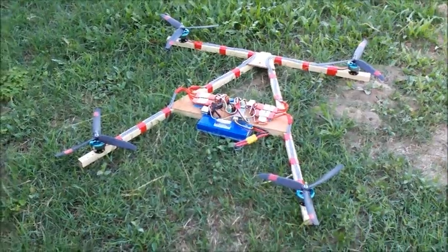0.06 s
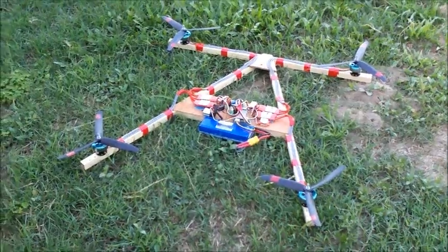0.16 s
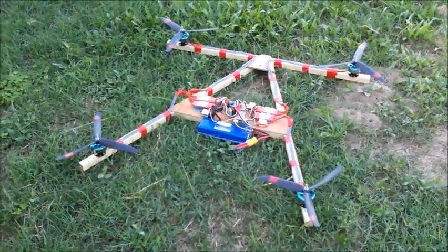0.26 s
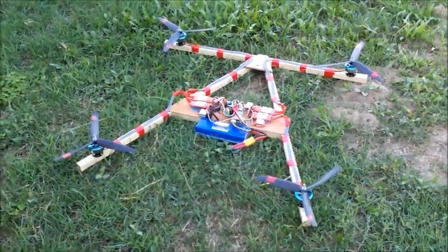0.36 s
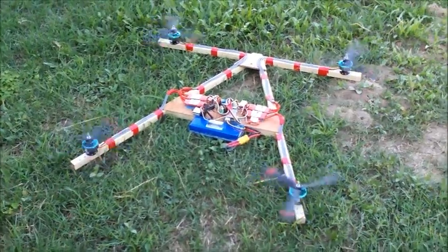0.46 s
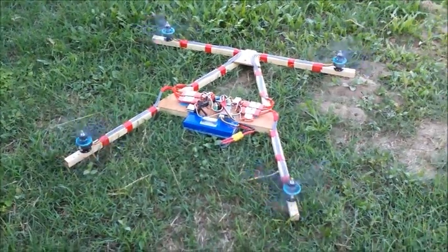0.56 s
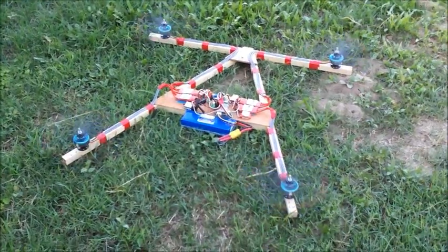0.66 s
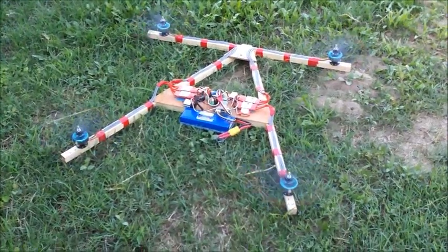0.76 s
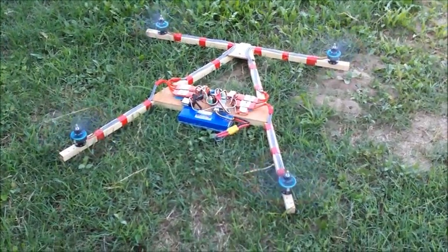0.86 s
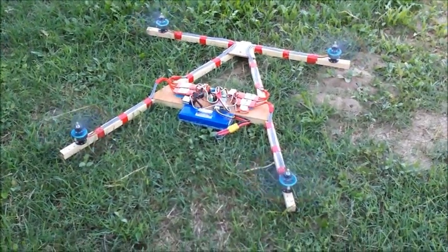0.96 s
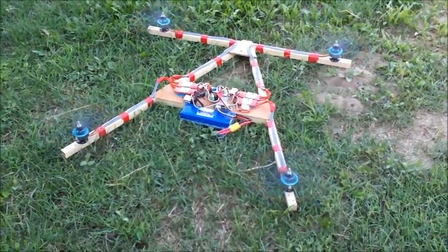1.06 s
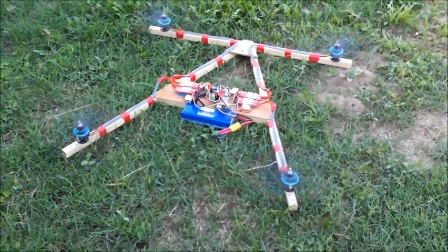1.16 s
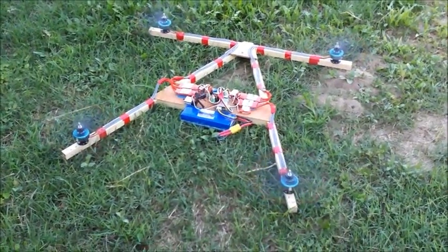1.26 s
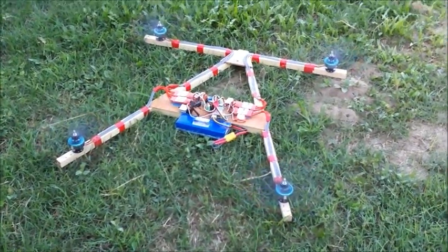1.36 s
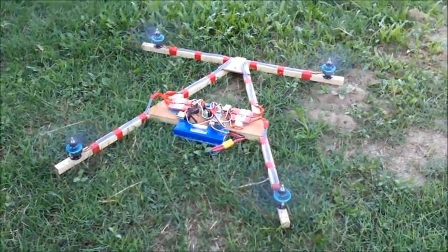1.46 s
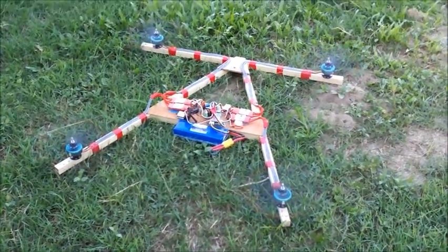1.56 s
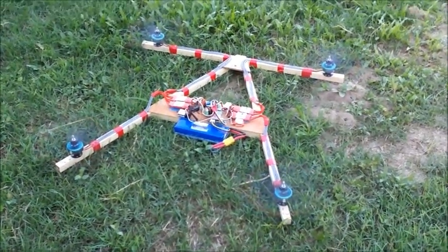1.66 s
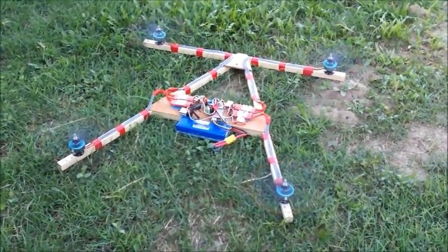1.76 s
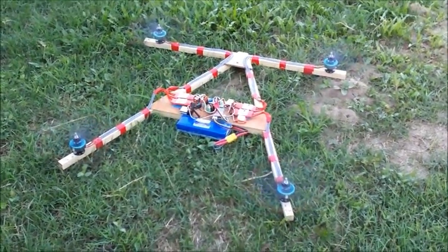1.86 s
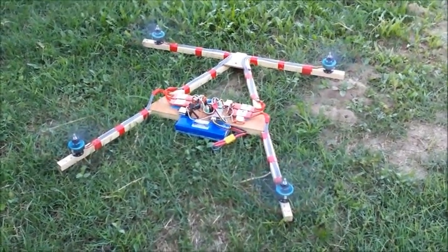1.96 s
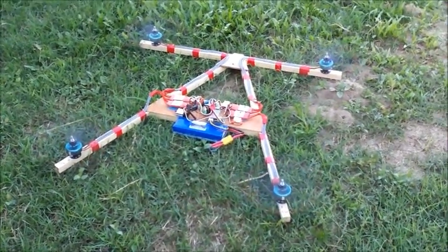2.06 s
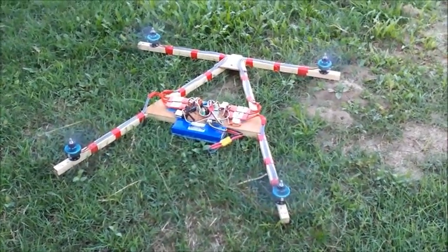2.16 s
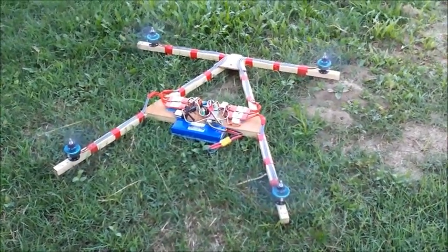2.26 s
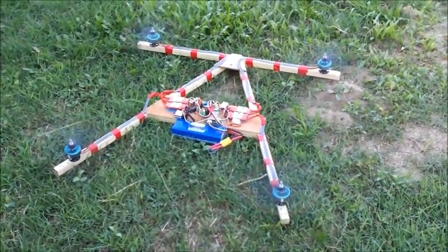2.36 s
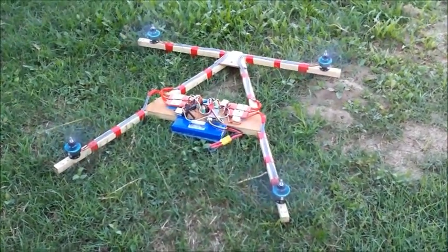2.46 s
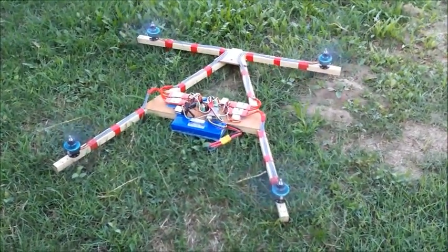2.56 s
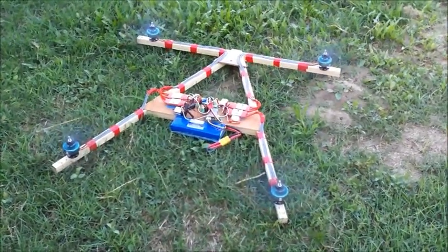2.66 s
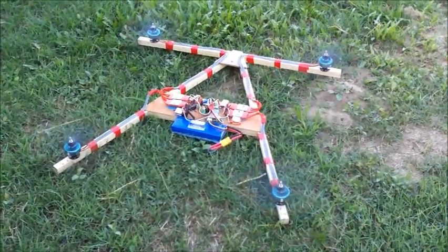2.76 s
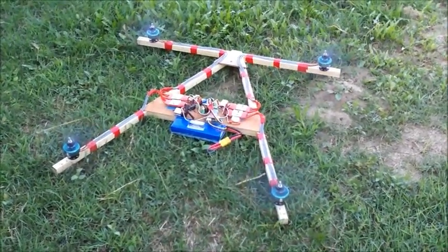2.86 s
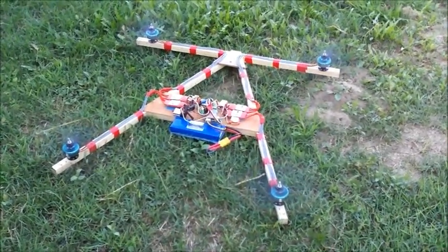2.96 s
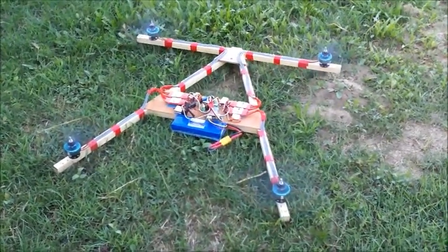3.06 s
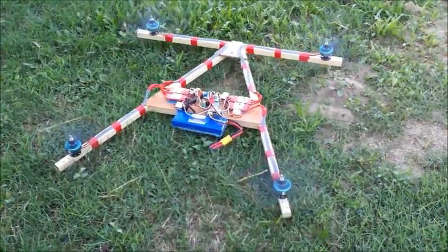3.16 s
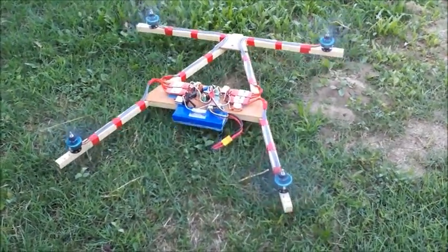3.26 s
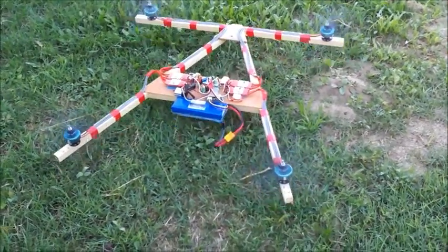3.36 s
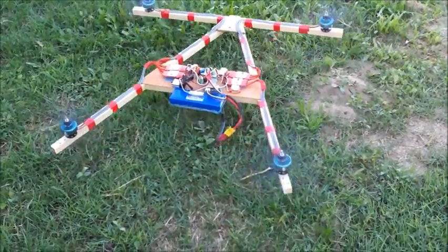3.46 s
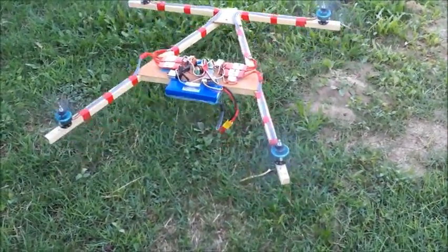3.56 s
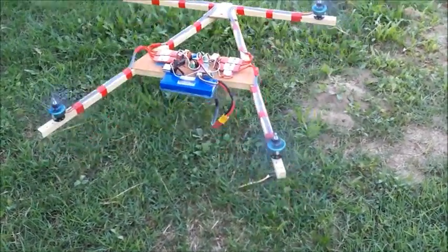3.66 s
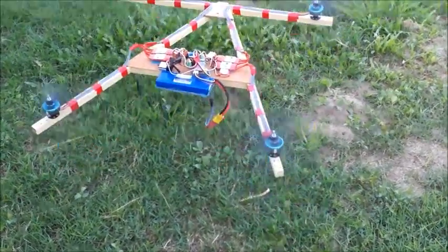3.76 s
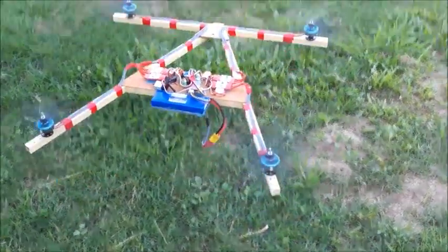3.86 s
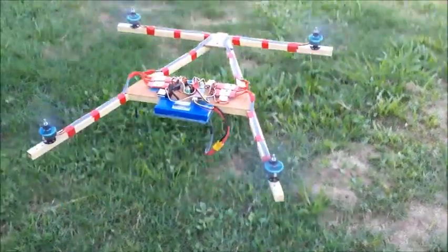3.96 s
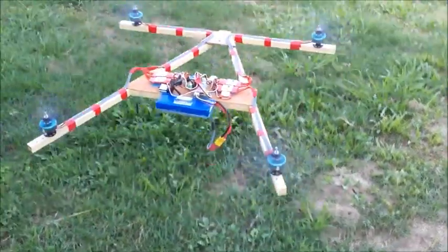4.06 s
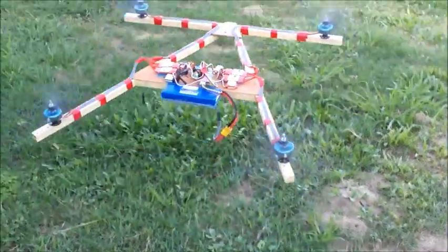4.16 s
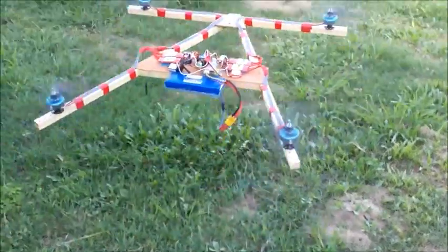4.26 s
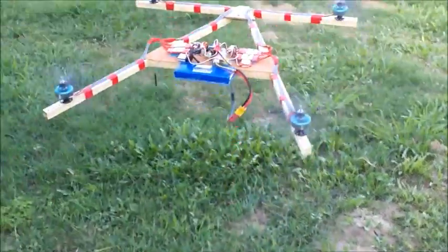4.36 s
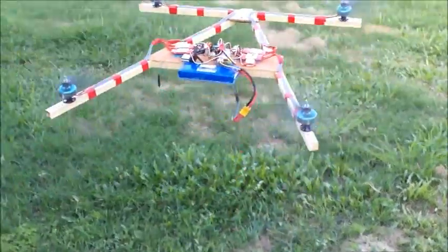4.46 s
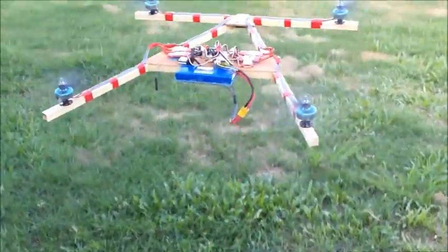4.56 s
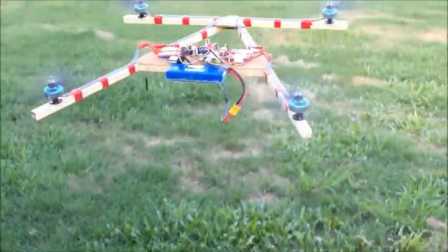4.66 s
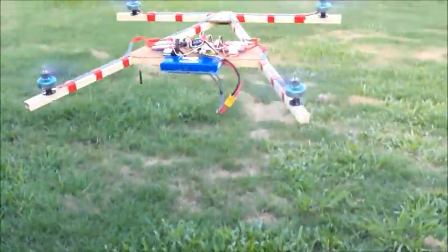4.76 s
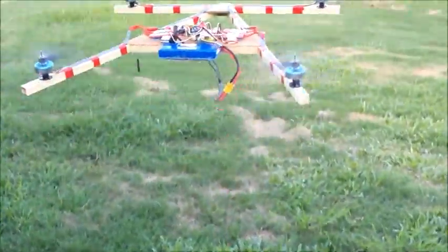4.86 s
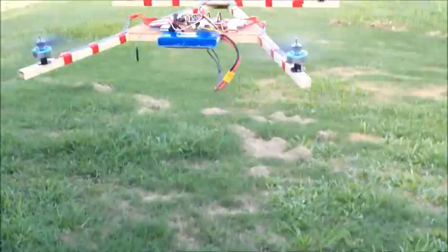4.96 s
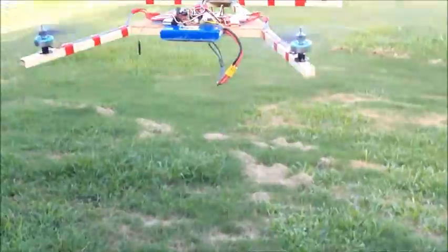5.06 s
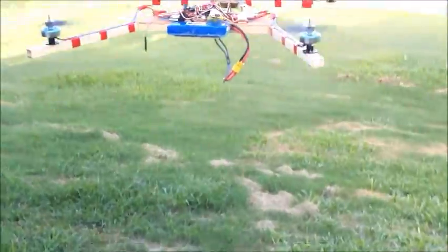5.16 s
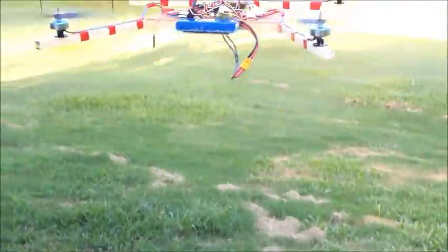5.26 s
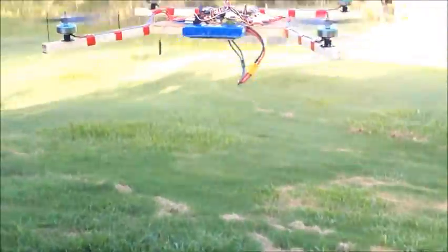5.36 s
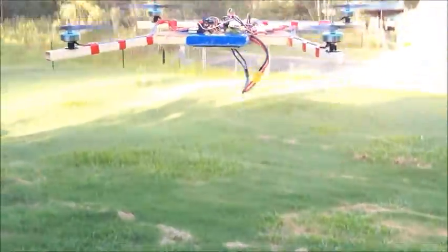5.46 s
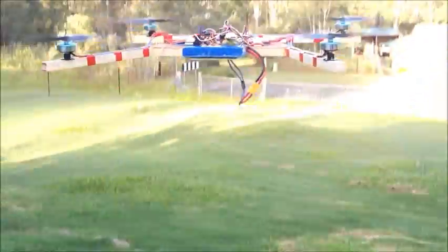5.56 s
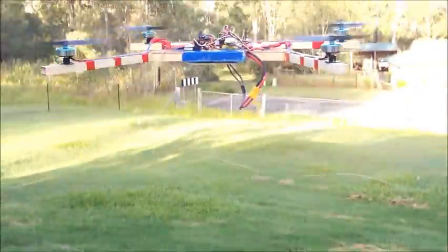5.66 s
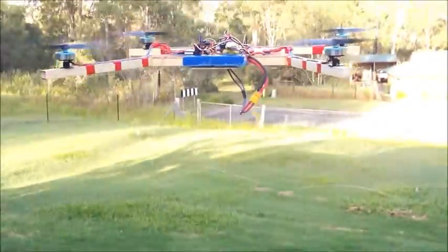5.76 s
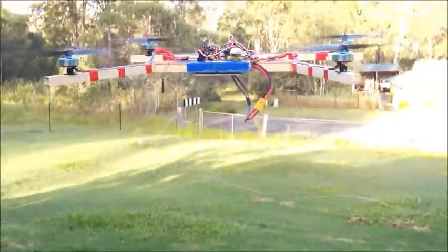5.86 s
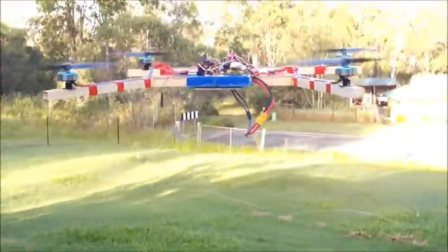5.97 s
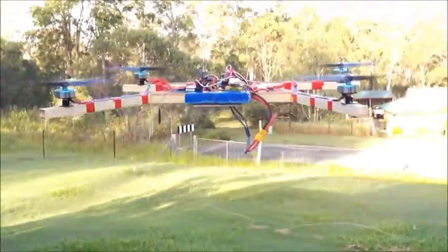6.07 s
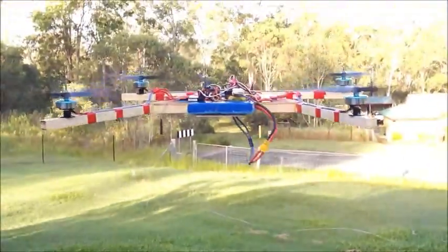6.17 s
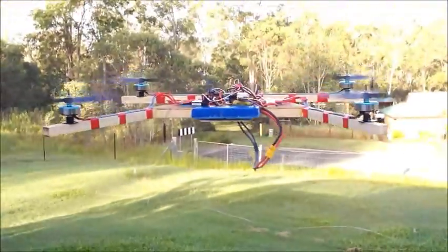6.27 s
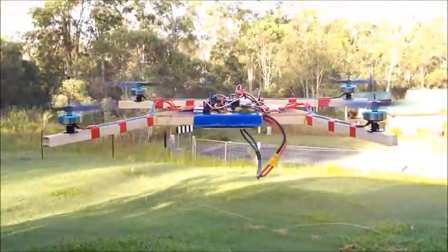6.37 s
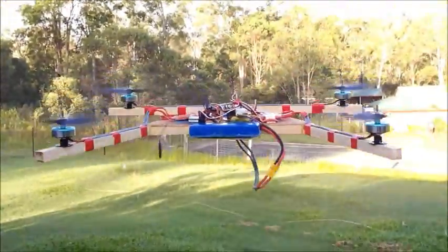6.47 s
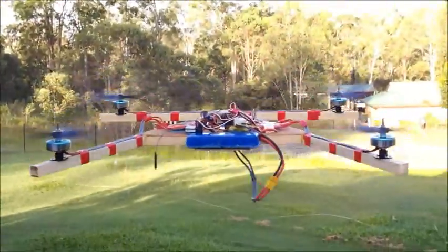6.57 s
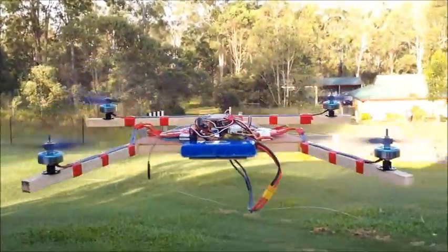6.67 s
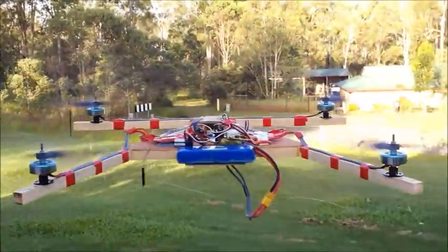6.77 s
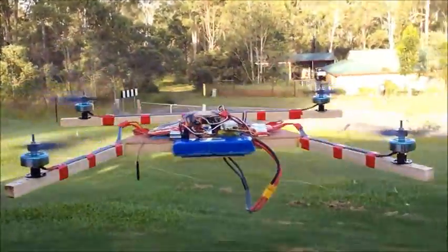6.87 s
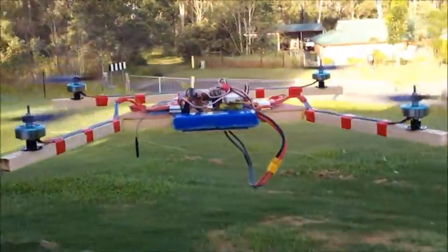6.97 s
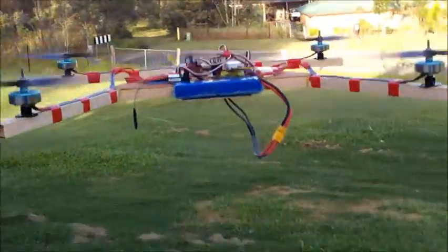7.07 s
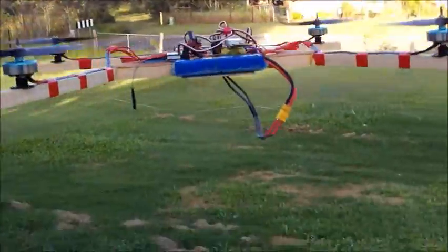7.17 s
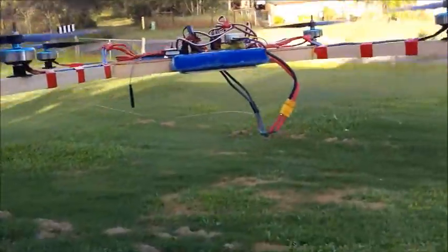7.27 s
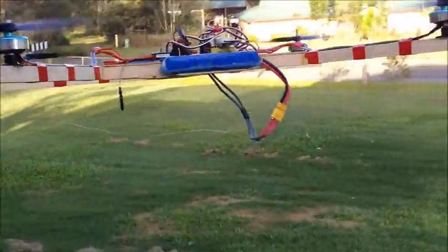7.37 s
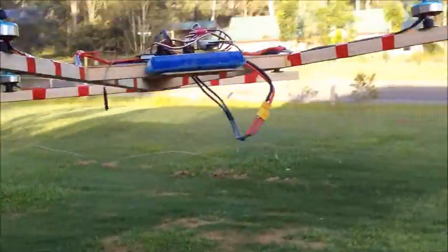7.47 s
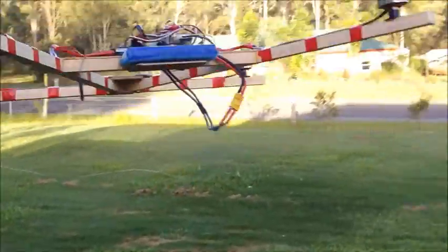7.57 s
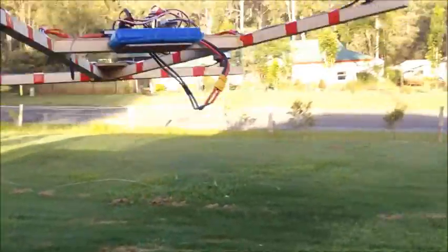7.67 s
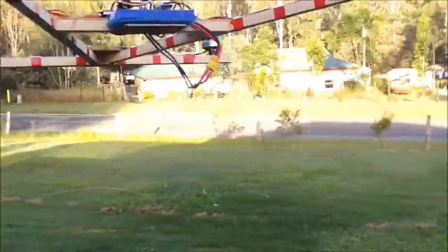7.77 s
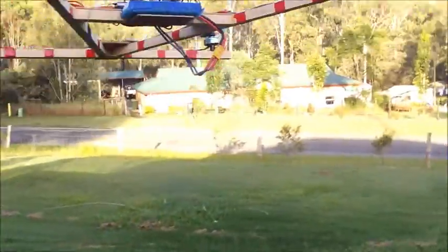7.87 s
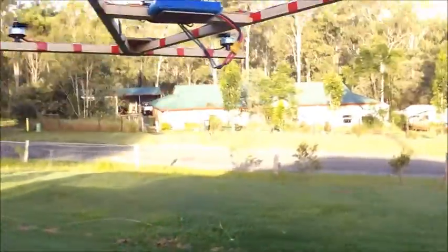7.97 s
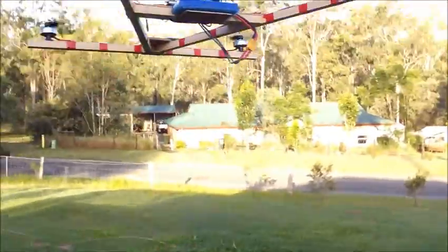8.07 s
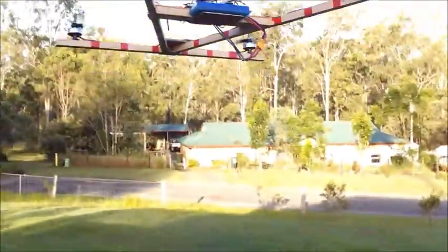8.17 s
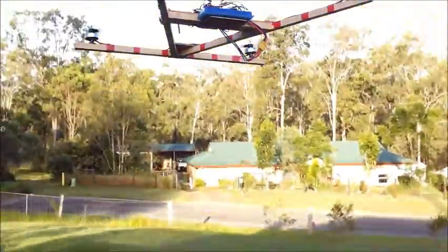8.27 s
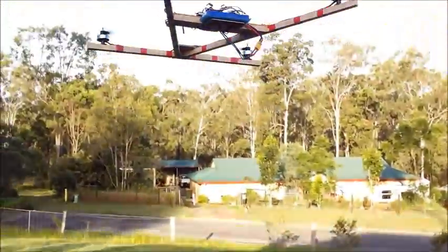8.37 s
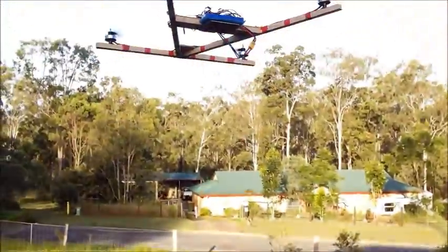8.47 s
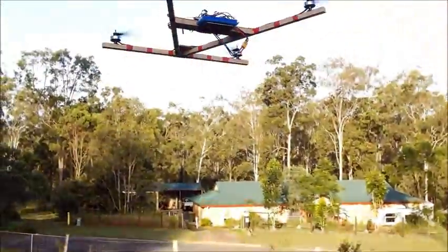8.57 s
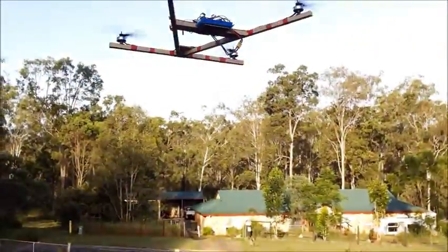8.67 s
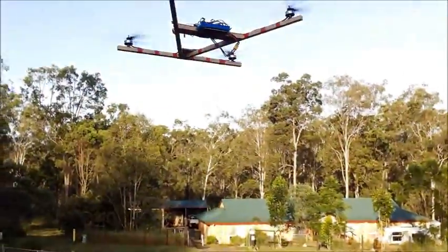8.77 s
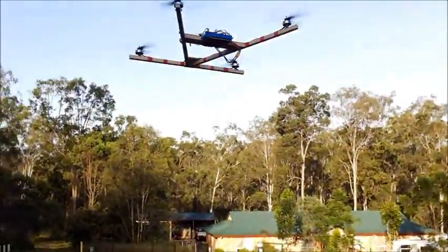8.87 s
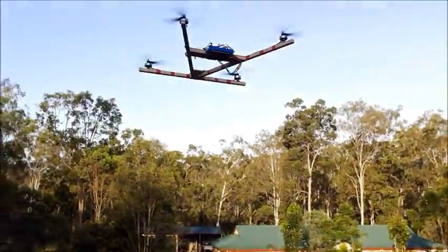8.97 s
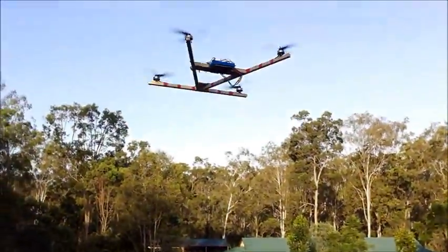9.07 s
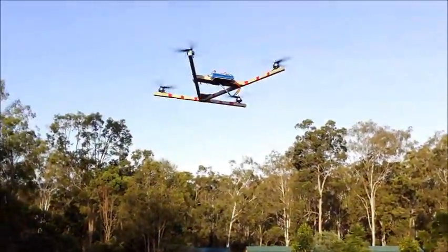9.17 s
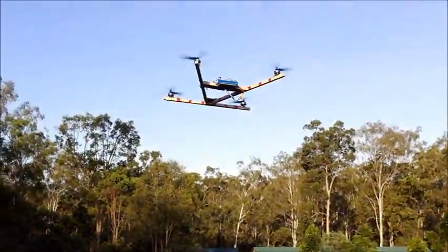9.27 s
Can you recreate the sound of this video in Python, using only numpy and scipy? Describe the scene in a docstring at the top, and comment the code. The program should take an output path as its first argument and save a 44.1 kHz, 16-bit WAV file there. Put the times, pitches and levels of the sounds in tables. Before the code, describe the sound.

A quiet lawn opens with a faint hush of air and a tiny electronic whistle. At about 0.5 seconds a small drone's motors start with sharp clacks, scratchy squeals and a brief metallic ring. Blade tips snip the grass, and the wooden frame knocks lightly on the ground several times until 1.8 seconds. Meanwhile the four propellers build into a buzz that rises in pitch, with hissing air and a thin, high whine. The drone lifts off around 3 seconds and is loudest until about 4.5, with brief rasps and a high, ringing motor whistle that comes and goes. From 5 to 7 seconds it hovers nearby, softer, its pitch wavering. Between 7 and 8.3 seconds it sweeps close, swelling and brightening, with faint puffs of air on the microphone. It then climbs overhead, thinner and fainter, still buzzing at about 9.3 seconds.

```python
"""On a quiet lawn, a home-built drone spins up, lifts off, hovers close by and climbs away overhead.
Its four three-bladed propellers buzz, one slap of air for each passing blade, and churn the air into a
hiss. The motors whine as their current switches on and off, and their bells (the spinning metal caps)
ring. At first the motors clack and squeal, the wooden frame knocks and the blade tips clip the grass.
Later, as the drone sweeps past, the air it blows down puffs against the microphone."""
import sys
import numpy as np
from scipy import signal
from scipy.fft import rfft, irfft, next_fast_len
from scipy.io import wavfile
from scipy.ndimage import uniform_filter1d

SR = 44100
rng = np.random.default_rng(int(sys.argv[2]) if len(sys.argv) > 2 else 0)


def store_wav(level_fs):
    """Save 16-bit WAV to argv[1]."""
    pcm = np.round(np.clip(np.atleast_2d(level_fs), -1, 1) * 32767)
    wavfile.write(sys.argv[1], SR, pcm.T.astype(np.int16))


N = 411453
TIME = np.arange(N) / SR
FFT_SIZE = next_fast_len(N, True)
BIN_HZ = np.maximum(np.arange(FFT_SIZE // 2 + 1) * SR / FFT_SIZE, 1)

START_S, SPIN_UP_S, HOVER_TURNS_PER_S, BLADES = .49, .3, 95, 3
LIFTING_S = (2.0, 3.4)   # the drone grows light and leaves the lawn
PASS_S = (7.15, 7.82, 8.35)   # it sweeps past: begins, closest, ends
OVERHEAD_S = (7.8, 8.7)   # it climbs overhead, where its frame hides the motors
LEAVING_S = (8.2, 8.7)   # it turns its underside to the microphone

# Levels in the tables are relative: the functions add their own gains.
# speed asked of the rotors; one pair works harder to keep the drone level:
# (time [s], rotor 1 [turns/s], rotor 2 [turns/s], rotor 3 [turns/s], rotor 4 [turns/s])
ASKED_SPEEDS = [(.49, 45.5, 44.8, 43.6, 42), (1.6, 55, 53.8, 52.2, 50.5), (1.8, 62.5, 61.5, 59.5, 58),
                (2.1, 80, 79, 77, 75), (2.57, 99, 83, 81, 78), (2.72, 96.5, 85, 83.5, 82),
                (3.08, 100, 86, 84.5, 82), (3.22, 103, 101, 88, 85), (3.38, 108, 105.5, 86, 84),
                (3.7, 106, 102, 88, 86), (3.85, 106.5, 103, 89, 87.5), (4.22, 105.5, 103, 87, 84.5),
                (4.5, 104.3, 102.8, 88.3, 86.5), (4.8, 102.3, 101, 88.8, 87.3),
                (5.15, 102.3, 100.5, 86.7, 85.5), (5.35, 98.5, 96, 81.4, 82.2), (5.8, 98, 95.6, 82.4, 83),
                (6.2, 97.5, 95, 84.8, 84), (6.5, 96, 94, 87.2, 86), (6.66, 101.5, 98, 93, 91),
                (6.85, 103, 101, 99.5, 95), (7.1, 100, 98.7, 97.5, 94), (7.42, 101, 99, 97, 95),
                (7.65, 99.6, 98, 97, 94), (8.0, 102.5, 100.5, 98.5, 95), (8.15, 106, 104.5, 94, 92),
                (8.33, 107, 105, 93.5, 91.5), (8.52, 98, 96, 94, 91), (8.8, 99.3, 97.5, 95, 90),
                (9.33, 99.6, 98, 92, 88.5)]
# how much each rotor wanders as the flight controller nudges it: (share of its speed [0-1])
SPEED_WANDER = (.008, .011, .005, .012)
# how far the drone is from the microphone: (time [s], distance [m])
DISTANCE = [(0, 1.3), (3, 1.104), (4.5, 1.236), (6, 1.14), (7.4, 0.87), (8.1, 1.09), (8.7, 1.42),
            (9.33, 3.2)]
# from on the lawn (0) to above the microphone (1): (time [s], share aloft [0-1])
ALOFT = [(0, 0.035), (2.8, 0.014), (3.5, 0.45), (4.5, 0.48), (5.4, 0.88), (7.1, 0.63), (7.7, 0.91),
         (9.33, 1)]
# rotors beam their noise along their axes, so they are quieter edge-on: (time [s], level [dB])
BEAM = [(.5, -5.5), (2.0, -4.5), (3.1, -2.5), (3.4, 0.25), (4.2, -0.5), (4.8, -6), (5.5, -11.5),
        (6.3, -12.5), (6.8, -11), (7.5, -10), (7.78, -5), (8.3, -9), (8.8, -12.5), (9.33, -9.5)]
# how much louder the faster pair of rotors buzzes than the slower pair: (time [s], extra level [dB])
PAIR_BALANCE = [(.5, 8), (1.6, 11), (1.95, -2), (3.05, 2.5), (3.5, 3), (3.9, -6.5), (4.4, 8), (4.9, -0.5),
                (5.5, -2), (9.33, -2)]

# quiet outdoor air: (frequency [Hz], level [dB])
OUTDOOR_COLOUR = [(25, -34), (60, -25), (110, -9), (160, -17), (300, -11.5), (500, -7.5), (950, -1),
                  (1850, -10.5), (2450, -10.5), (3300, -16), (6500, -18.5), (9000, -13), (11500, -27),
                  (15000, -30)]
# puffs of air on the microphone: (time [s], peak level [dB], rise and fall time [s])
PUFFS = [(7.163, -58, 0.04), (7.307, -62, 0.032), (7.44, -66, 0.035), (7.73, -77, .04), (7.89, -60, 0.082)]
# the rumble of those puffs: (frequency [Hz], level [dB])
PUFF_COLOUR = [(25, -10), (60, 4), (120, 8), (200, 7), (400, -25), (1000, -62)]
# blade tips clipping grass: (time [s], level [dB])
GRASS_SNIPS = [(0.638, -39), (0.666, -50), (0.6934, -37), (0.7069, -31), (0.8071, -45), (0.8939, -48),
               (0.9124, -46), (0.9967, -43)]
# the frame knocking on the ground: (time [s], level [dB])
KNOCKS = [(0.5594, -38), (1.007, -31.5), (1.1207, -30), (1.2929, -50), (1.3262, -30), (1.3817, -51),
          (1.518, -30), (1.5868, -32), (1.603, -29), (1.8068, -31)]
# the notes the wooden frame rings at: (frequency [Hz], level [dB], time to fade by 60 dB [s])
FRAME_MODES = [(775, -9.5, 0.067), (1280, -26, 0.018), (1570, -1.5, 0.029), (1820, -4.5, 0.027),
               (1980, -19, .02), (3360, -9, 0.0087)]

# motors jerking into motion: (time [s], level [dB])
CLACKS = [(.523, -46), (.559, -37), (.643, -44.5), (.668, -44), (.81, -43.5), (.84, -42.5)]
# a motor breaking loose: (start [s], end [s], first pitch [Hz], last pitch [Hz], level [dB])
SQUEALS = [(.57, .67, 1570, 2030, -55), (0.656, 0.798, 1900, 2220, -54), (0.778, 0.829, 1670, 1660, -44)]
# shaft tones from unbalance and from the 14 magnets: (rate [cycles/turn], level [dB])
SHAFT_TONES = [(2, -25), (4, -18.5), (7, -6.5), (8, -7), (14, -1.5)]
# the notes the motor bells ring at: (frequency [Hz], width [Hz], level [dB])
BELL_MODES = [(5726, 40, 1.5), (5507, 177, -0.5), (5640, 66, -4.5)]
# the magnetic ripple behind the bells' rough ringing: (time [s], level [dB])
RIPPLE_LEVEL = [(.5, -24), (2.0, -14), (3.3, -14), (4.1, -16), (4.7, -4), (5.12, -9), (5.28, -5.5),
                (6.0, -9.5), (6.6, -26), (6.72, -1), (7.0, -8), (7.25, 1), (7.4, 1), (7.65, -1.5),
                (7.9, -2), (8.15, -3), (8.6, -13), (9.33, -17)]
# the loudest bell singing as ripple stays near its note: (time [s], pitch [Hz], level [dB])
BELL_WHISTLE = [(3.0, 5520, -60), (3.09, 5620, -38), (3.145, 5735, -26.5), (3.2, 5960, -44),
                (3.52, 5880, -48), (3.6, 5745, -25.5), (3.68, 5880, -44), (3.9, 5940, -38),
                (4.18, 5800, -37), (4.27, 5730, -29), (4.38, 5775, -32), (4.55, 5785, -27.5),
                (4.67, 5750, -31), (4.73, 5890, -33), (4.8, 5700, -30), (4.87, 5755, -31),
                (4.99, 5750, -25), (5.05, 5900, -38), (5.11, 5815, -33), (5.18, 5825, -32),
                (5.26, 5620, -39), (5.42, 5750, -42), (5.7, 5720, -40), (6.15, 5820, -46), (6.6, 5700, -52),
                (6.76, 5725, -33), (6.82, 5820, -28), (6.87, 5730, -28), (6.97, 5690, -38),
                (7.33, 5540, -38), (7.41, 5760, -23.5), (7.47, 5600, -38), (7.55, 5755, -29),
                (7.65, 5720, -40), (7.8, 5740, -30), (7.92, 5610, -33), (8.03, 5615, -32),
                (8.06, 5740, -22.5), (8.1, 5875, -36), (8.22, 5880, -37), (8.3, 5950, -36),
                (8.44, 5665, -33), (8.5, 5690, -34), (8.6, 5690, -52), (9.33, 5700, -60)]
# tones of the whine: (multiple of the switching rate [x], shift [cycles/turn], level [dB])
WHINE_TONES = [(1, -14, -7.5), (1, 14.5, -16.5), (1, 2, -17.5), (1, -24.5, -18), (2, -17, -31)]
# how strong the whine is: (time [s], level [dB])
WHINE_LEVEL = [(.5, -1), (.8, -2), (1.1, -2), (1.76, 2), (1.86, -2), (2.03, 0), (2.5, 0.5), (3.3, -3),
               (4.5, 2), (6, -0.5), (9.33, 4)]

# the low, middle and top band of the churned air: (low edge [Hz], high edge [Hz])
AIR_BANDS = [(700, 2500), (2500, 5200), (9200, 14500)]
# loudness of each band: (level in a hover at 1 m [dB], rise per doubled speed [dB], beam weight [x])
AIR_LEVELS = [(-29, 8.5, 1.21), (-25.5, 12.5, 1.19), (-33, 16, 0.71)]
# propeller sound heard from above, on the lawn: (frequency [Hz], level [dB])
COLOUR_ABOVE = [(90, -58), (200, -5), (400, -6.5), (700, -3), (950, 5.5), (1200, 2.5), (1600, 2.5),
                (2500, -4.5), (3900, -2), (4700, -5.5), (6500, -1), (8000, -4.5), (11000, -11),
                (15000, -18.5)]
# the same from beside, in the air: (frequency [Hz], level [dB])
COLOUR_BESIDE = [(170, -17), (420, -9.5), (600, -4), (830, 1.5), (1130, -9), (1450, -1), (1900, -3),
                 (2300, -0.5), (4600, -3.5), (6200, -0.5), (8200, -11), (9600, -8), (12500, -14),
                 (15000, -19)]
# the same from close underneath: (frequency [Hz], level [dB])
COLOUR_CLOSE = [(170, -29), (420, -13), (600, -8), (750, 4), (890, 5), (1130, -8.5), (1490, 1.5),
                (2050, -6.5), (2420, -2), (3400, -5.5), (4600, -3), (6200, -0.5), (8200, -7), (9600, -1.5),
                (12500, -7), (15000, -9)]
# the same from far beneath: (frequency [Hz], level [dB])
COLOUR_BENEATH = [(100, -63), (170, -33), (282, -17), (504, -19), (575, -16.5), (643, -30), (776, -4),
                  (1150, -23), (1360, -9.5), (1870, -14), (2300, -12), (3610, -12.5), (4960, -9.5),
                  (5550, -2.5), (8080, -8.5), (9930, -2.5), (15000, -10)]
# how the blade tones stand out from those colours: (frequency [Hz], boost [dB])
BLADE_BOOST = [(90, -5), (190, -16), (290, 3.5), (400, 14), (540, 16.5), (900, 11), (1500, 13),
               (2500, 12.5), (4500, 4), (9000, 1)]
# change to the low blade tones just above the lawn: (frequency [Hz], boost [dB])
GROUND_BOOST = [(230, -10), (310, 2.5), (460, 4.5), (570, -3.5), (750, 4.5), (1000, 0), (1500, 1)]
# blade tones surge as the blades bite harder: (time [s], level [dB])
BLADE_BITE = [(.5, 0), (1.4, 1.5), (2.0, -.5), (2.6, 1), (3.1, -1), (3.45, 1.5), (4.05, -3.5), (4.6, 1.5),
              (5.3, 0), (6.5, -0.5), (7.4, -1), (7.85, 3), (8.4, -3), (9.33, -5.5)]
# blade sound bouncing off the arms and the ground: (delay [s])
ECHO_DELAYS = (.0007, .0016, .0027)
# blades cutting through their own wake: (time [s], half-length [s], centre [Hz], level [dB])
RASPS = [(3.413, 0.033, 2900, -25.5), (3.545, 0.054, 2090, -30), (3.883, .006, 6200, -27),
         (3.963, 0.011, 2200, -29), (7.83, .012, 3300, -28.5)]


def from_db(db):
    """Turn decibels into a gain to multiply by."""
    return 10 ** (np.asarray(db) / 20)


def rms_one(x):
    """Scale a signal so that its average level (rms) is 1."""
    return x / np.sqrt(np.mean(x ** 2) + 1e-20)


def running_rms(x, size):
    """Average level over a sliding window of samples."""
    return np.sqrt(np.maximum(uniform_filter1d(x ** 2, size), 0) + 1e-5 * np.mean(x ** 2))


def sine(cycles):
    """A pure tone, from a running count of its cycles."""
    return np.sin(2 * np.pi * cycles)


def in_time(rows):
    """Join a table's points in time: one curve for each column after the first."""
    times, *columns = np.transpose(rows)
    return [np.interp(TIME, times, column) for column in columns]


def gains(points):
    """Turn a colour table (how loud each frequency is) into a gain for every frequency."""
    hz, db = np.transpose(points)
    return from_db(np.interp(np.log(BIN_HZ), np.log(hz), db))


def colour(x, gain):
    """Filter a signal with a gain for every frequency."""
    return irfft(rfft(x, FFT_SIZE) * gain, FFT_SIZE)[:N]


def noise(gain):
    """Filtered noise with an average level of 1."""
    return rms_one(colour(rng.standard_normal(N), gain))


def resonance(hz, width_hz):
    """The filter of something that rings at one note; 1 at its peak."""
    return 1 / (1 + 1j * (BIN_HZ ** 2 - hz ** 2) / (BIN_HZ * width_hz))


def drift(rate_hz, step=40):
    """A smooth random wander, about 1 in size; a higher rate wanders faster."""
    pole = np.exp(-2 * np.pi * step * rate_hz / SR)
    kicks = rng.standard_normal(N // step + 2002)
    slow = signal.lfilter([1], [1, -2 * pole, pole * pole], kicks)[2000:]   # skip the settling
    return np.interp(np.arange(N) / step, np.arange(len(slow)), rms_one(slow))


def rotor_speeds():
    """Turns per second of each rotor, building up gradually at the start."""
    spun_up = 1 - np.exp(-np.maximum(TIME - START_S, 0) / SPIN_UP_S)
    return np.maximum(np.array(in_time(ASKED_SPEEDS)) * spun_up, 1)


def rotor_turns(nudge_hz=8):
    """How far each rotor has turned; the flight controller keeps nudging the speeds."""
    return [rng.random() + np.cumsum(speed * (1 + wander * drift(nudge_hz))) / SR
            for speed, wander in zip(rotor_speeds(), SPEED_WANDER)]


def loudness(hover_db, doubling_db, beam_weight=0):
    """Gain of a sound that grows with rotor speed, fades with distance and can follow the beam."""
    doublings = np.log2(rotor_speeds().mean(axis=0) / HOVER_TURNS_PER_S)
    db = hover_db + doubling_db * doublings + beam_weight * in_time(BEAM)[0]
    return from_db(db) / in_time(DISTANCE)[0]


def progress(span_s):
    """0 before a stretch of time, rising to 1 at its end."""
    return np.interp(TIME, span_s, [0, 1])


def rotor_gains(rotor_db):
    """Gain of each rotor as the loudness shifts between the faster and the slower pair."""
    shift_db = in_time(PAIR_BALANCE)[0] / 2
    return [from_db(db + side * shift_db) for db, side in zip(rotor_db, (1, 1, -1, -1))]


def directions():
    """The propellers' colour from four sides, each with its share over time."""
    aloft = np.clip(in_time(ALOFT)[0], 0, 1)
    beneath = progress(LEAVING_S)
    close = np.interp(TIME, PASS_S, [0, 1, 0]) * (1 - beneath)
    rest = 1 - beneath - close
    return [(gains(COLOUR_ABOVE), (1 - aloft) * rest), (gains(COLOUR_BESIDE), aloft * rest),
            (gains(COLOUR_CLOSE), close), (gains(COLOUR_BENEATH), beneath)]


def outdoors(level_db=-55):
    """The soft, steady hush of the open air."""
    return from_db(level_db) * noise(gains(OUTDOOR_COLOUR))


def air_puffs(gain_db=-1):
    """A low rumble swells and fades with each puff the rotors blow across the microphone."""
    swell = sum(from_db(db + gain_db) * np.exp(-np.abs(TIME - s) / fade_s) for s, db, fade_s in PUFFS)
    return swell * noise(gains(PUFF_COLOUR))


def ticks(rows, band_hz, decay_s, gain_db, size=1000):
    """Small, dry hits: each is a burst of noise that dies away at once."""
    bursts = np.zeros(N)
    fade = np.exp(-TIME[:size] / decay_s)
    for s, db in rows:
        at = round(s * SR)
        bursts[at:at + size] += from_db(db + gain_db) * rng.standard_normal(size) * fade
    return signal.sosfilt(signal.butter(2, band_hz, "band", fs=SR, output="sos"), bursts)


def frame_knocks(gain_db=2, low_cut_hz=800):
    """The wooden frame taps the ground and rings; its thin arms give off no bass."""
    taps, wood = np.zeros(N), 0
    for s, db in KNOCKS:
        taps[round(s * SR)] = from_db(db + gain_db)
    for hz, db, fade_s in FRAME_MODES:
        decay, angle = from_db(-60 / (fade_s * SR)), 2 * np.pi * hz / SR   # both per sample
        feedback = [1, -2 * decay * np.cos(angle), decay * decay]
        wood += from_db(db) * signal.lfilter([0, np.sin(angle)], feedback, taps + 1e-18)
    return signal.sosfilt(signal.butter(2, low_cut_hz, "high", fs=SR, output="sos"), wood)


def idle_whistle(hz=7870, width_hz=110, level_db=-66):
    """The thin whistle of the electronics, switched on and waiting."""
    return from_db(level_db) * noise(resonance(hz, width_hz) ** 2)


def start_ring(level_db=-44, peak_s=.548, attack_s=.025, decay_s=0.18, hz=5660, width_hz=270):
    """The jolt of starting rings the motor bells; the ring swells and dies away."""
    swell = np.exp(np.minimum((TIME - peak_s) / attack_s, (peak_s - TIME) / decay_s))
    return from_db(level_db) * swell * noise(resonance(hz, width_hz) ** 2)


def motor_squeals(waver=0.018, scratch_db=3):
    """A motor breaks loose with short, scratchy squeals."""
    out = 0
    for start, end, first_hz, last_hz, db in SQUEALS:
        along = np.clip((TIME - start) / (end - start), 0, 1)
        hz = (first_hz + (last_hz - first_hz) * along) * (1 + waver * drift(65))
        swell = np.sqrt(np.abs(np.sin(np.pi * along)))
        out += from_db(db + scratch_db * drift(120)) * swell * sine(np.cumsum(hz) / SR)
    return out


def motor_growl(rotors, level_db=-50, loudest_turns_per_s=44, span_turns_per_s=5, tugs_per_turn=30):
    """The magnets' tugging makes a tone that rises with speed and is loud only around one speed."""
    off_peak = (rotor_speeds().mean(axis=0) - loudest_turns_per_s) / span_turns_per_s
    return sine(tugs_per_turn * rotors[2]) * from_db(level_db + 2 * drift(25)) / (1 + off_peak ** 2)


def shaft_tones(rotors, level_db=-45, waver_db=3, rotor_db=(-3, -4, 0, -10), beneath_db=7):
    """The shafts shake the wooden arms once aloft; one tone stands out from beneath."""
    out = 0
    for per_turn, db in SHAFT_TONES:
        tone = sum(sine(per_turn * turns) * from_db(motor_db + waver_db * drift(4.2))
                   for turns, motor_db in zip(rotors, rotor_db))
        out += tone * from_db(db + beneath_db * progress(LEAVING_S) * (per_turn == 8))
    return out * np.clip(in_time(ALOFT)[0], 0, .7) * loudness(level_db, doubling_db=14)


def motor_bells(rotors, ripple_db=(-34, -35, -44, -47), flare_db=3, wobble_hz=24, per_turn=56):
    """Magnetic ripple, low switching tones and bearing noise all set the motor bells ringing."""
    ripple = 0
    for db, turns in zip(ripple_db, rotors):
        for rate in (per_turn, per_turn + 1):   # an off-centre bell splits the ripple in two
            flare = from_db(db + flare_db * drift(12))
            wobble = np.cumsum(wobble_hz * drift(39.97)) / SR   # quick throttle changes shake it
            ripple += flare * sine(rate * turns + wobble)
    ripple *= from_db(in_time(RIPPLE_LEVEL)[0])
    # these tones flare up as they sweep through the bells' notes
    sweeps = sum(from_db(db) * sine(switching_cycles() - rate * turns)
                 for turns in rotors[:2] for rate, db in ((per_turn, -30), (per_turn / 2, -36)))
    sweeps = colour(sweeps, resonance(hz=5640, width_hz=450)) * loudness(0, doubling_db=8.5)
    bearings = loudness(-21, doubling_db=9) * rng.standard_normal(N)
    metal = sum(from_db(db) * resonance(hz, width_hz) for hz, width_hz, db in BELL_MODES)
    near_main_note = resonance(BELL_MODES[0][0], width_hz=800)
    return colour(ripple + sweeps + bearings, metal * near_main_note)


def bell_whistle(gain_db=-3.7, wobble_hz=13, waver_db=2.6):
    """The loudest bell sings one thin, slightly unsteady tone."""
    hz, db = in_time(BELL_WHISTLE)
    tone = np.sqrt(2) * sine(np.cumsum(hz + wobble_hz * drift(30.8)) / SR)
    return tone * from_db(db + gain_db + waver_db * drift(34)) * (TIME > BELL_WHISTLE[0][0])


def switching_cycles(hz=7637):
    """How many times the motor current has switched on and off so far."""
    return hz * TIME


def motor_whine(rotors, level_db=-36, shade_db=-5, waver_db=1, rotor_db=(-2.5, -5, -3, -11)):
    """The switching tone splits into tones that spread apart as the magnets pass faster."""
    out = 0
    for turns, motor_db in zip(rotors, rotor_db):
        switching = switching_cycles() + rng.random()
        tones = sum(from_db(db) * sine(multiple * switching + round(shift) * turns)
                    for multiple, shift, db in WHINE_TONES)
        out += tones * from_db(motor_db + waver_db * drift(27))
    shaded_db = shade_db * progress(OVERHEAD_S)   # overhead, the arms are in the way
    return np.sqrt(2) * out * loudness(level_db + in_time(WHINE_LEVEL)[0] + shaded_db, doubling_db=1)


def churned_air(rotors, swish=0.094, flutter_db=0.5, low_cut_hz=600):
    """Swirling air off the blades hisses, swelling at each pass; its colour turns as the drone rises."""
    passes = sum(np.cos(2 * np.pi * BLADES * turns) for turns in rotors) / 4
    air = rng.standard_normal(N) * np.exp(swish * passes) * from_db(flutter_db * drift(40))
    spectrum = rfft(rms_one(air), FFT_SIZE) * BIN_HZ ** 2 / np.hypot(BIN_HZ ** 2, low_cut_hz ** 2)
    log_centres = np.log(np.prod(AIR_BANDS, axis=1)) / 2
    views, out = directions(), 0
    for k, ((low, high), levels) in enumerate(zip(AIR_BANDS, AIR_LEVELS)):
        # each band fades into its neighbours
        band = np.interp(np.log(BIN_HZ), log_centres, np.arange(len(log_centres)) == k)
        level = loudness(*levels)
        for shape, share in views:
            band_rms = np.sqrt(np.mean(shape ** 2 * (BIN_HZ > low) * (BIN_HZ < high)))
            out += irfft(spectrum * shape * band / band_rms, FFT_SIZE)[:N] * share * level
    return out


def blade_hum(rotors, level_db=-48, shade_db=-11, waver_db=5.5, rotor_db=(-2, 0, -4, -8)):
    """A low tone at the rate the blades pass; it is weak from beneath and when they turn slowly."""
    tone = sum(sine(BLADES * turns) * gain * from_db(waver_db * drift(4.7))
               for gain, turns in zip(rotor_gains(rotor_db), rotors))
    level = loudness(level_db + shade_db * progress(OVERHEAD_S), doubling_db=36, beam_weight=0.79)
    return tone / running_rms(tone, size=9000) * level


def blade_slaps(turns, unequal=0.26, rough=0.047, jitter_s=.000025, gusty_db=2.5):
    """One pulse of pressure per passing blade; the blades differ a little and meet uneven air."""
    chance = rng.standard_normal((4000, 2))
    blade = np.arange(np.ceil(turns[0] * BLADES), turns[-1] * BLADES).astype(int)
    at = np.interp(blade / BLADES, turns, np.arange(N)) + jitter_s * SR * chance[blade, 0]
    at = np.clip(at, 0, N - 2)
    strength = 1 + unequal * (blade % BLADES - 1) + rough * chance[blade, 1]
    whole, part = at.astype(int), at % 1   # each pulse is shared between two samples
    pulses = np.bincount(whole, strength * (1 - part), N) + np.bincount(whole + 1, strength * part, N)
    return pulses * from_db(gusty_db * drift(9.7))


def blade_rasps(rotors, width_hz=800):
    """Brief runs of harder, brighter slaps as one rotor cuts through its own wake."""
    slaps, out = blade_slaps(rotors[0], gusty_db=-2.5), 0
    for s, half_s, hz, db in RASPS:
        swell = from_db(db) * np.exp(-((TIME - s) / half_s) ** 2)
        out += swell * rms_one(colour(slaps, resonance(hz, width_hz)))
    return out


def with_echoes(x, strength=.3):
    """Short echoes through churning air come and go, so each blade tone swells and fades on its own."""
    return x + sum(strength * drift(11) * np.roll(x, round(s * SR)) for s in ECHO_DELAYS)


def blade_buzz(rotors, level_db=-32, waver_db=1.08, rotor_db=(0, -2, -.5, -7),
               smear_s=.0015, smear_hz=4000):
    """Fast slaps blend into four buzzes that beat against each other and grow with speed."""
    slaps = sum(gain * with_echoes(blade_slaps(turns))
                for gain, turns in zip(rotor_gains(rotor_db), rotors))
    lifted = progress(LIFTING_S)
    slaps = (1 - lifted) * colour(slaps, gains(GROUND_BOOST)) + lifted * slaps
    # a blade sweeps over its arm from root to tip, drawing each slap out into a short chirp
    chirp = np.exp(-1j * np.pi * smear_s * BIN_HZ ** 2 / smear_hz)
    buzz = sum(share * colour(slaps, gains(BLADE_BOOST) * shape * chirp)
               for shape, share in directions())
    core = colour(buzz, (BIN_HZ > 400) & (BIN_HZ < 1000))   # this band sets the level
    surge_db = level_db + in_time(BLADE_BITE)[0] + waver_db * drift(6.4)
    return buzz / running_rms(core, size=7000) * loudness(surge_db, doubling_db=16, beam_weight=1)


def scene(onset_s=0.022):
    """The drone over a quiet lawn, the same in both ears."""
    rotors = rotor_turns()
    running = np.clip((TIME - START_S) / onset_s, 0, 1)
    propellers = blade_hum(rotors) + blade_buzz(rotors) + churned_air(rotors) + blade_rasps(rotors)
    motors = motor_whine(rotors) + motor_bells(rotors) + start_ring() + bell_whistle()
    motors += motor_growl(rotors) + shaft_tones(rotors)
    drone = running * (propellers + motors) + motor_squeals() + (1 - running) * idle_whistle()
    clacks = ticks(CLACKS, band_hz=(1500, 5200), decay_s=0.006, gain_db=3)
    snips = ticks(GRASS_SNIPS, band_hz=(8000, 14000), decay_s=0.0036, gain_db=-4.5)
    mix = outdoors() + air_puffs() + snips + clacks + frame_knocks() + drone
    return np.array([mix, mix])


def record(dry, bass_hz=55, hiss_db=-92, top_hz=15400):
    """The microphone loses deep bass, each channel adds faint hiss, and the highest treble is cut."""
    thin = signal.sosfilt(signal.butter(2, bass_hz, "high", fs=SR, output="sos"), dry)
    hissy = thin + from_db(hiss_db) * rng.standard_normal((2, N))
    return signal.sosfilt(signal.ellip(12, .1, 80, top_hz, fs=SR, output="sos"), hissy)


dry = scene()
out = record(dry)
store_wav(out)
```